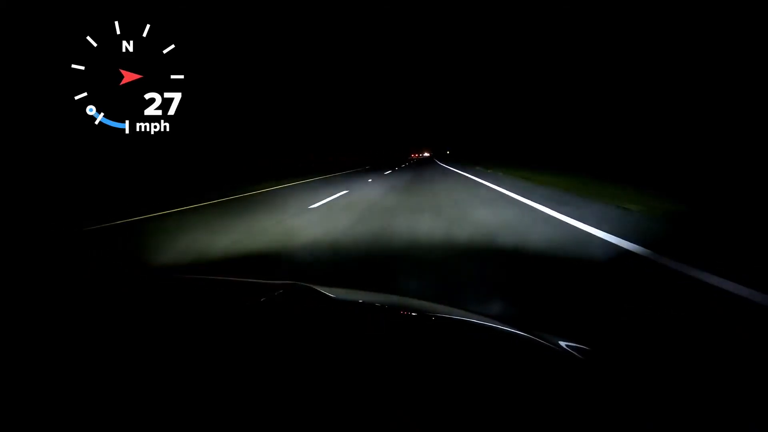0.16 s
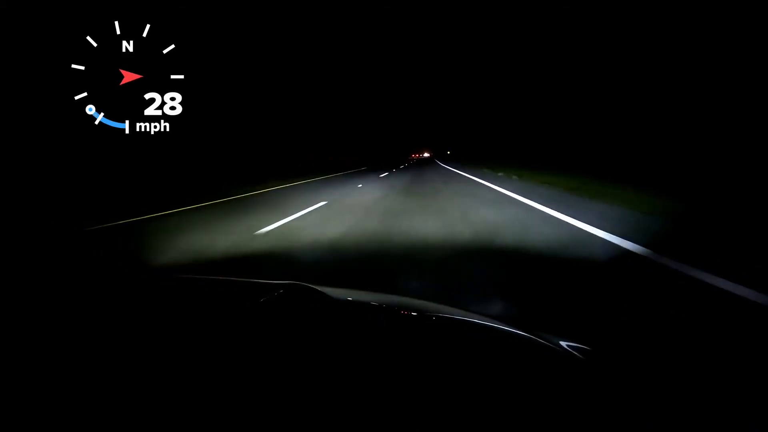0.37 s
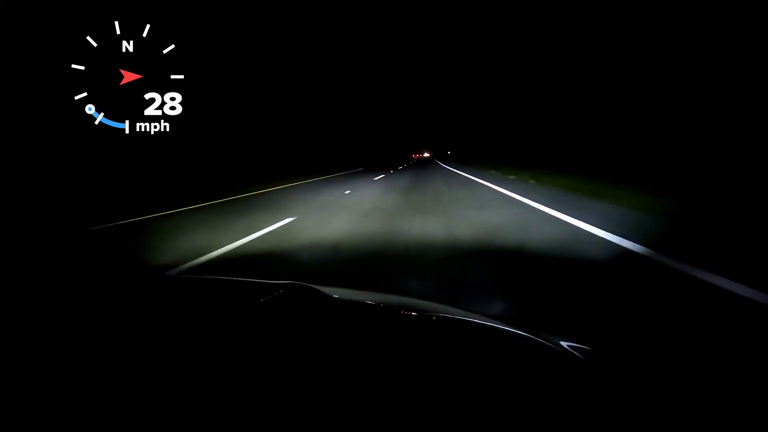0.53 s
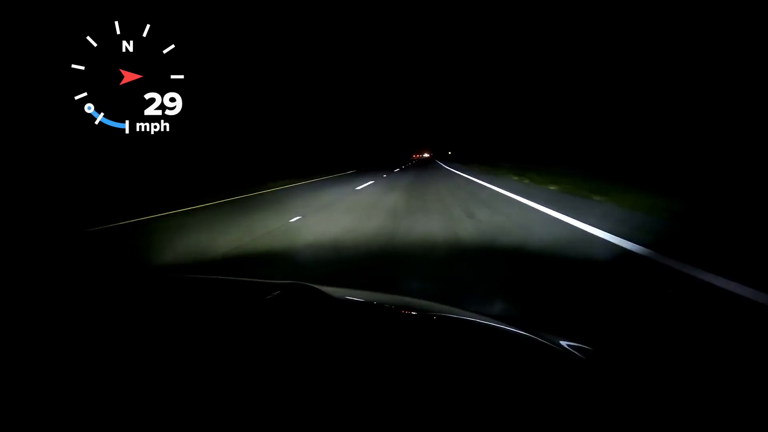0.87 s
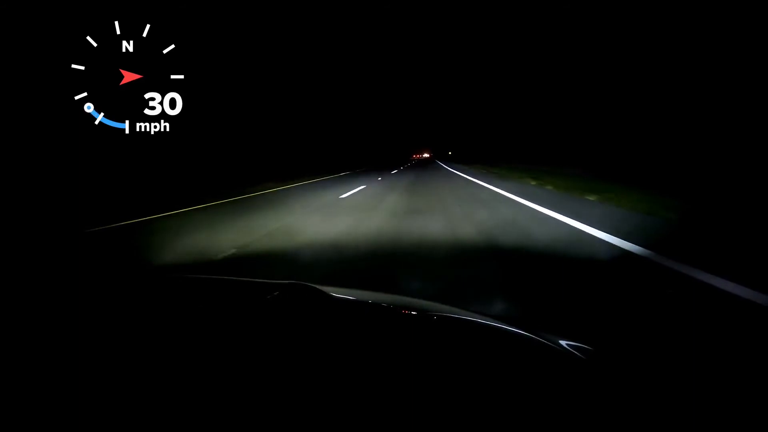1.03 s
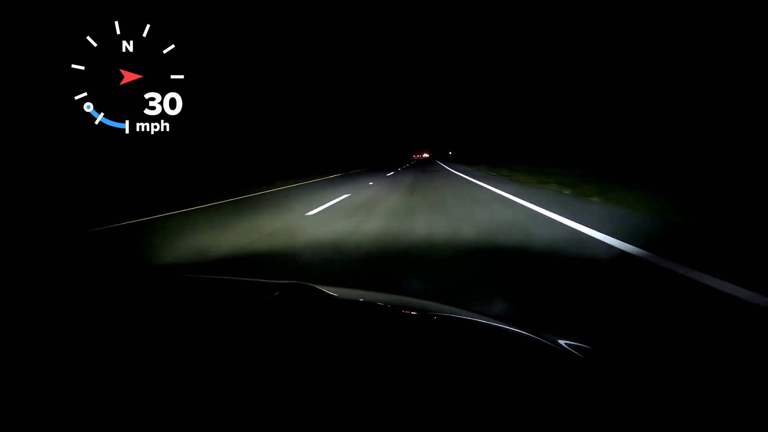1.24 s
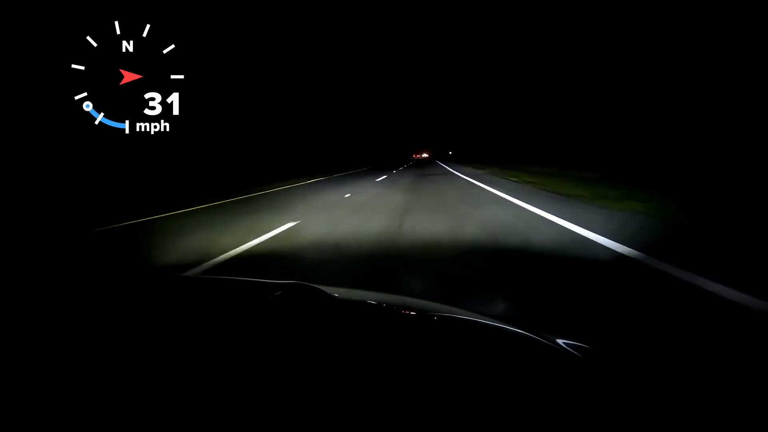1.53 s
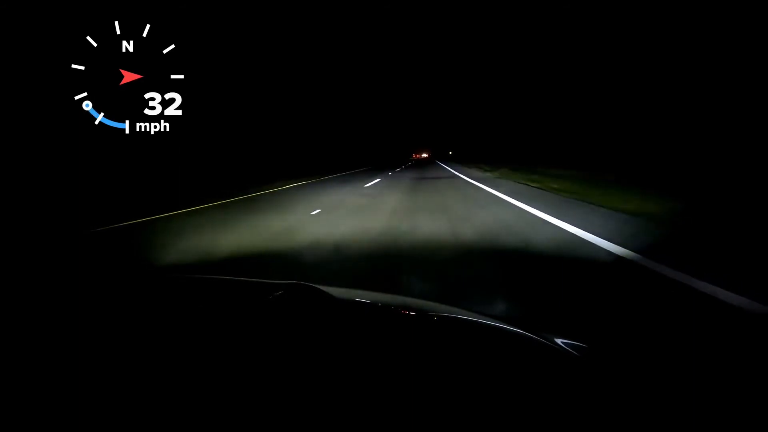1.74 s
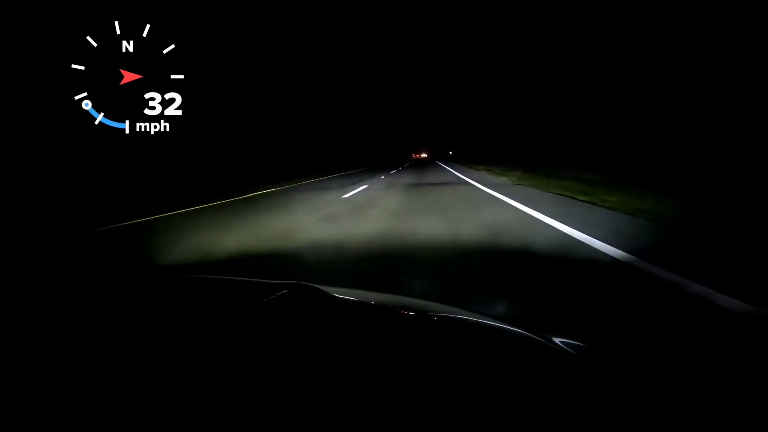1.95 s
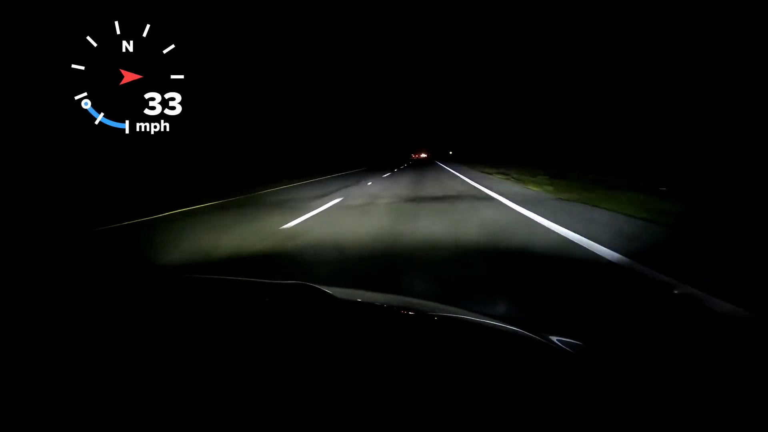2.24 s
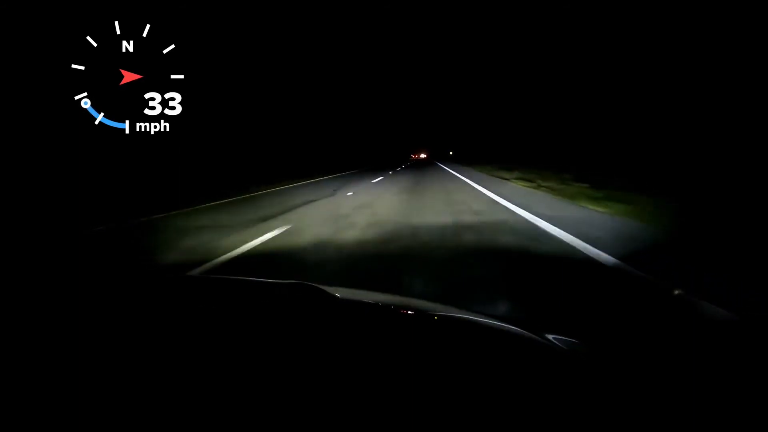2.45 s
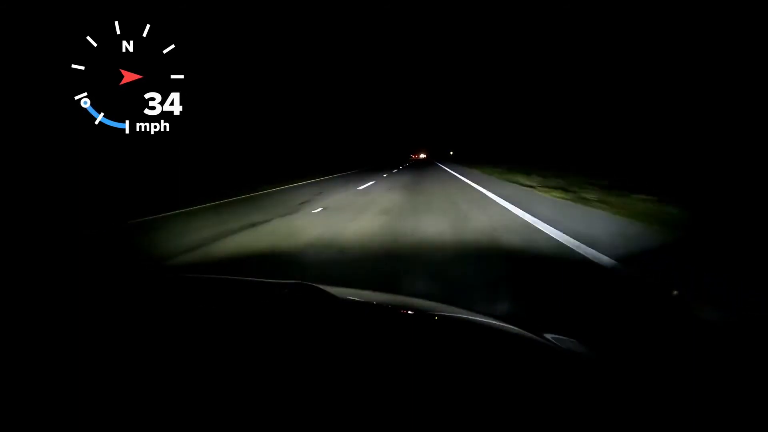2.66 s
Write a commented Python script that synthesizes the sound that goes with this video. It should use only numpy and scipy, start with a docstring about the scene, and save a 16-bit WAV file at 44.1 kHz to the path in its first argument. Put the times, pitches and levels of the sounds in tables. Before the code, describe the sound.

Inside an accelerating car, a deep engine drone rises amid swelling road noise, with a late bump

```python
"""A low engine drone is heard first, within tyre roar and air hiss, at the windscreen of an accelerating car.
The drone is a harmonic stack of crankshaft orders that swell and fade as they cross the cabin's resonances.
The road sound is filtered noise that grows with speed; narrow bands of noise add a tyre tone and whistles.
Near the end the wheels thump over a patch, as short pressure pulses, and the drone falters.
A limiter ducks everything where the sum is too loud."""
import sys
import numpy as np
from scipy import signal
from scipy.fft import rfft, irfft
from scipy.io import wavfile
from scipy.ndimage import uniform_filter1d

SR = 44100
rng = np.random.default_rng(int(sys.argv[2]) if len(sys.argv) > 2 else 0)


def log_audio(samples):
    """Write samples as a 16-bit WAV file to the path given in sys.argv[1]."""
    # one column per channel
    frames = np.atleast_2d(samples).T
    # limit to full scale, then quantise
    limited = np.clip(frames, -1, 1)
    pcm = np.round(limited * 32767).astype(np.int16)
    wavfile.write(sys.argv[1], SR, pcm)


N = 123480
TIME = np.arange(N) / SR

# crankshaft speed: time_s, turns_per_second_hz
CRANK_SPEED = [(0, 50.9), (1, 55.5), (2, 60.3), (2.8, 64.6)]
# cabin resonances, the level of an engine order by its pitch: pitch_hz, level_db
CABIN_RESPONSE = [(30, -42), (58, -30.5), (80, -28), (102, -15.6), (110, -17.2), (121, -16.1), (128, -17.5),
                  (142, -27), (153, -23), (162, -19), (166, -19.2), (171, -21.5), (183, -24.7), (193, -31),
                  (206, -25), (219, -27), (226, -20.3), (241, -22.7), (256, -34), (280, -41), (340, -47),
                  (400, -41), (460, -48), (590, -45), (700, -56)]
# gain of the drone, which falters at the bump: time_s, gain_db
DRONE_GAIN = [(0, 0), (2.3, 0), (2.35, -6), (2.42, -2), (2.5, -.5), (2.8, -2)]
WAVER_HZ, WAVER_TURNS, FLUTTER_DB = 9, .004, .4  # both drifts are rms

# spectrum of tyre roar and air hiss in the cabin: pitch_hz, relative_density_db (per Hz)
ROAD_SPECTRUM = [(20, -7), (36, -1.5), (60, -0.5), (85, -1.5), (140, -4), (215, 0.5), (280, -6),
                 (390, -7.5), (500, -11.5), (600, -8.5), (780, -12.5), (1050, -19), (1190, -17),
                 (1450, -24), (1850, -24), (2200, -25), (2500, -29.5), (3000, -30), (4000, -35.5),
                 (5700, -39), (6400, -43), (7300, -46.5), (8800, -55), (10500, -64.5), (12500, -80.5)]
# growth of the road noise: time_s, rumble_db, roar_db, hiss_db
ROAD_GROWTH = [(0, 2, -2.5, -3), (.55, 1, -1, -1.5), (.85, 3.5, 0.5, -1), (1.2, 1, 0.5, -0.5),
               (1.6, 4.5, 3.5, 1.5), (2.1, 4.5, 6.5, 4), (2.35, 6.5, 4.5, 5), (2.8, 8, 3.5, 5)]
RUMBLE_HZ, ROAR_HZ, HISS_HZ = 153, 600, 2200  # pitches where the growth columns apply
ROAD_DB = -27  # before growth
PATCH_DB, FLICKER_DB, FLICKER_HZ = .7, .35, 17

# narrow rings in the noise: pitch_hz, width_hz, start_level_db, end_level_db
NOISE_RINGS = [(831, 12, -57, -39), (2910, 40, -64, -67), (4720, 100, -62, -68), (5210, 90, -71, -66),
               (5410, 70, -67, -65)]

# wheel blows on the patch: centre_s, level_db, pitch_hz, length_s
WHEEL_BLOWS = [(2.324, -11.5, 204, 0.0093), (2.352, -8.5, 85.5, 0.03), (2.383, -7, 142, 0.0083),
               (2.403, -4, 218, 0.015), (2.405, -9, 71.7, 0.026), (2.427, -16, 140, 0.013)]
# the body shakes on its suspension
HEAVE_S, HEAVE_DB, HEAVE_HZ, HEAVE_LENGTH_S = 2.356, -18.5, 35, 0.16

LIMIT_DB, RECOVER_DB_PER_S, LIMIT_ATTACK_S = -7, 40, .01
EDGE_HZ = 12500


def amp(db):
    """Level law: decibels to an amplitude ratio."""
    return 10 ** (np.asarray(db) / 20)


def unit(x):
    """Normalization: scales to rms 1."""
    return x / np.sqrt(np.mean(x ** 2) + 1e-20)


def curves(table, t):
    """Linear interpolation: each column of a table, read at the times or pitches t."""
    s, *columns = np.transpose(table)
    return [np.interp(t, s, column) for column in columns]


def band_noise(hz, width_hz):
    """Band filtering: noise of rms 1 in a soft-edged band; around 0 Hz it is a slow random drift."""
    f = np.fft.rfftfreq(N, 1 / SR)
    white = rfft(rng.standard_normal(N))
    return unit(irfft(white / (1 + ((f - hz) / width_hz) ** 4), N))


def add(mix, s, sound):
    """Superposition: adds a sound to the mix, centred on the time s."""
    start = max(round(s * SR) - len(sound) // 2, 0)
    part = mix[start:][:len(sound)]
    part += sound[:len(part)]


def engine(count=11):
    """Resonance: firing pulses as crankshaft orders, each lifted and delayed by the cabin."""
    revs, = curves(CRANK_SPEED, TIME)
    turns = np.cumsum(revs) / SR + WAVER_TURNS * band_noise(0, WAVER_HZ)
    hz = np.arange(-2048, 2048)
    log_gain = np.log(amp(curves(CABIN_RESPONSE, abs(hz))[0]))
    # minimum phase: the Hilbert transform of the log gain gives the phase
    cabin = np.exp(np.conj(signal.hilbert(log_gain)))
    orders = np.zeros(N, complex)
    for k in range(1, count + 1):
        resonance = np.interp(k * revs, hz, cabin)
        flutter = amp(FLUTTER_DB * band_noise(0, WAVER_HZ))
        orders += resonance * np.exp(2j * np.pi * k * turns) * flutter
    # the factor makes the cabin levels rms
    return np.sqrt(2) * orders.real * amp(curves(DRONE_GAIN, TIME)[0])


def road():
    """Broadband excitation: rumble, roar and hiss grow with speed, a little patchy like the asphalt."""
    size, hop = 2048, 512
    hz, t, z = signal.stft(rng.standard_normal(N), SR, nperseg=size, noverlap=size - hop)
    pitch = np.log(hz + 1)
    f, db = np.transpose(ROAD_SPECTRUM)
    colour = unit(amp(np.interp(pitch, np.log(f), db)) * (hz > 0))  # nothing at 0 Hz
    anchors = np.log([RUMBLE_HZ, ROAR_HZ, HISS_HZ])
    rows = np.transpose(curves(ROAD_GROWTH, t))
    growth = np.transpose([np.interp(pitch, anchors, row) for row in rows])
    # random level drift, smoothed over pitch and then over time
    patches = uniform_filter1d(rng.standard_normal(z.shape), size=14, axis=0, mode="wrap")
    patches = unit(uniform_filter1d(patches, size=7, axis=1, mode="wrap"))
    z = z * colour[:, None] * amp(growth + PATCH_DB * patches)
    noise = signal.istft(z, nperseg=size, noverlap=size - hop)[1][:N]
    return noise * amp(ROAD_DB + FLICKER_DB * band_noise(0, FLICKER_HZ))


def rings():
    """Narrow-band noise: a tyre tone that comes up with speed, and faint whistles."""
    out = np.zeros(N)
    for hz, width, first, last in NOISE_RINGS:
        out += band_noise(hz, width / 2) * amp(np.linspace(first, last, N))
    return out


def thud(db, hz, length):
    """Pressure pulse: a cosine under a bell-shaped swell, dying within a few cycles."""
    t = np.arange(-round(length * SR), round(length * SR)) / SR
    swell = np.exp(-2 * np.pi * (t / length) ** 2)
    wave = np.cos(2 * np.pi * hz * t)
    balanced = wave - np.average(wave, weights=swell)  # no net pressure remains
    return -amp(db) * swell * balanced


def bump():
    """Impact: the wheels strike the patch and the body shakes."""
    out = np.zeros(N)
    for s, db, hz, length in WHEEL_BLOWS:
        add(out, s, thud(db, hz, length))
    add(out, HEAVE_S, thud(HEAVE_DB, HEAVE_HZ, HEAVE_LENGTH_S))
    return out


def scene():
    """Superposition: the pressures of all sources add at the windscreen."""
    return (engine() + road() + rings() + bump())[None]


def record(dry):
    """Dynamic compression: a limiter ducks quickly and recovers slowly, then the band is limited."""
    over_db = np.maximum(20 * np.log10(abs(dry[0]) + 1e-9) - LIMIT_DB, 0)
    fall = TIME * RECOVER_DB_PER_S
    held_db = np.maximum.accumulate(over_db + fall) - fall  # peaks decay at the recovery rate
    duck_db = uniform_filter1d(held_db, max(int(LIMIT_ATTACK_S * SR), 1))
    low_pass = signal.firwin(511, EDGE_HZ, window=("kaiser", 9), fs=SR)
    return signal.oaconvolve(dry / amp(duck_db), low_pass[None], "same")


dry = scene()
out = record(dry)
log_audio(out)
```